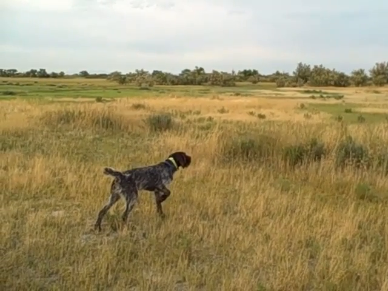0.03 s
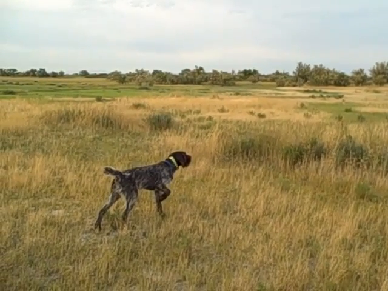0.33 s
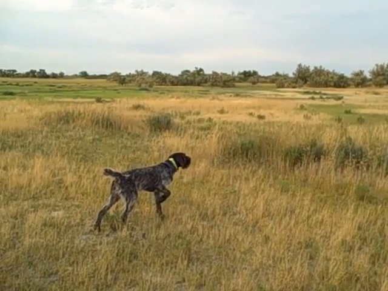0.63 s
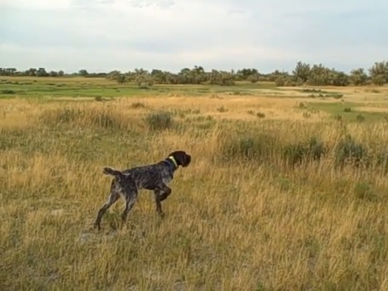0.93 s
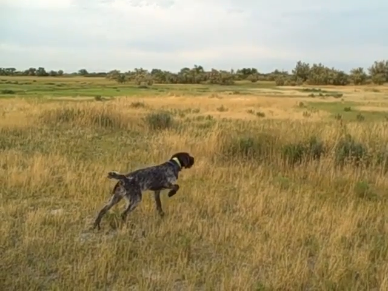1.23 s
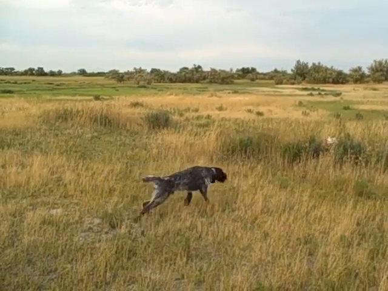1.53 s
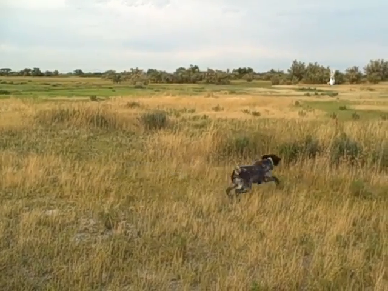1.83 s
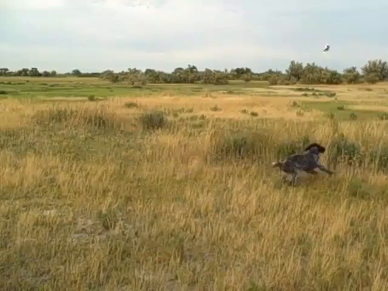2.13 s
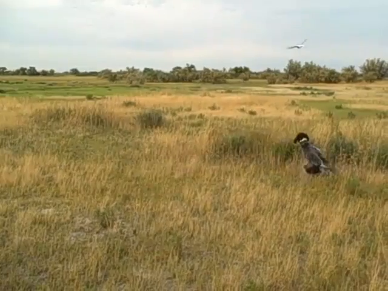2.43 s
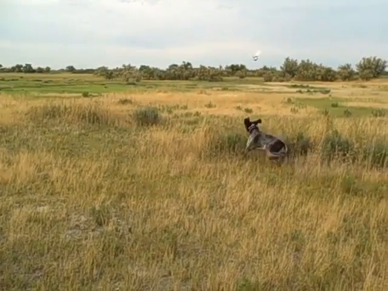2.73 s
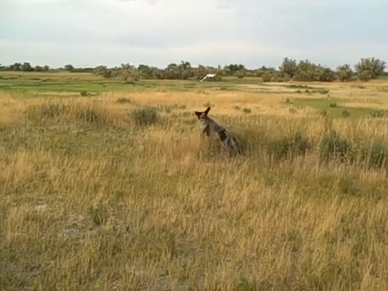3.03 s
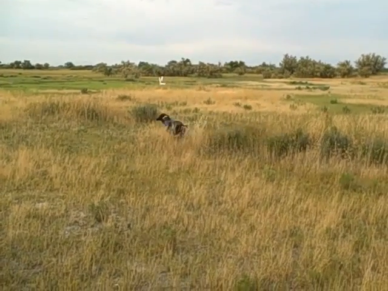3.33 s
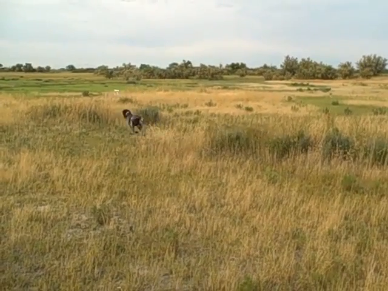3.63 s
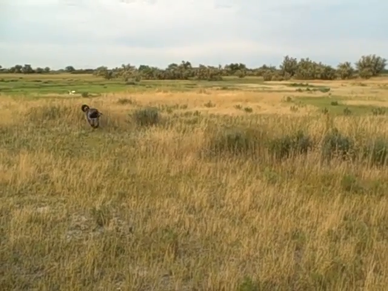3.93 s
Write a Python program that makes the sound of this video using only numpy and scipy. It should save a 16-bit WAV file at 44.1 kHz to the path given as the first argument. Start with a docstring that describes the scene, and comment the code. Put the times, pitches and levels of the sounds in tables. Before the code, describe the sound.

Wings clap as a bird takes off, with running paws, rustling grass and wind rumble.

```python
"""Open field of dry grass. Wind buffets the microphone; small birds call far off; a mosquito whines.
A pigeon-sized bird bursts out of the grass and climbs away, wing tips clapping, feathers humming.
A dog gallops after it: paws thud on the turf, stalks crackle and swish against its body."""
import sys
import numpy as np
from scipy import signal
from scipy.fft import rfft, irfft
from scipy.io import wavfile
from scipy.ndimage import uniform_filter1d

SR = 44100
rng = np.random.default_rng(int(sys.argv[2]) if len(sys.argv) > 2 else 0)


def transcribe(u):
    """Save the signal u as a 16-bit wav file named by the first command-line argument.

    u: samples, shape (n,) or (channels, n), limited to [-1, 1]; the rate is SR.
    q: integer samples, one column per channel.
    """
    v = np.clip(np.atleast_2d(u).T, -1, 1)
    q = np.round(v * 32767).astype(np.int16)
    wavfile.write(sys.argv[1], SR, q)


N = 176400
T = np.arange(N) / SR
SNAP_ATTACK_S, SWIPE_ATTACK_S = 0.00071, 0.0039
RASP = 0.022  # rms pitch deviation / pitch


def from_db(db):
    """Decibels to gain."""
    return 10 ** (np.asarray(db) / 20)


def rms_one(x):
    """Scale to rms 1."""
    return x / np.sqrt(np.mean(x ** 2) + 1e-20)


def coloured(x, colour):
    """Filter by (f/Hz, level/dB) points, rolling off beyond the ends; rms 1."""
    hz, db = np.transpose(colour)
    f_hz = np.arange(N // 2 + 1) * SR / N + 1e-3
    rolloff = np.minimum(1, f_hz / hz[0]) ** 2 * np.minimum(1, hz[-1] / f_hz) ** 2
    gain = from_db(np.interp(np.log(f_hz), np.log(hz), db))
    return rms_one(irfft(rfft(x) * rolloff * gain, N))


def noise(colour):
    """Coloured noise; rms 1."""
    return coloured(rng.standard_normal(N), colour)


def evened(x, span_s):
    """Hold the running rms near 1."""
    power = uniform_filter1d(x ** 2, max(int(span_s * SR), 2))
    return x / np.sqrt(np.abs(power) + 1e-9)


def pulse(at_s, attack_s, decay_s, hold_s=0):
    """Linear rise to 1 at at_s, hold, exponential decay."""
    rise = np.clip((T - at_s) / attack_s + 1, 0, 1)
    return rise * np.exp(-np.clip((T - at_s - hold_s) / decay_s, 0, 40))


def lumps(spread_db):
    """Gain wandering at about 10-20 Hz; rms 1."""
    return rms_one(from_db(spread_db * noise([(10, 0), (20, 0)])))


def crackle(per_s, spread_db):
    """Random clicks of uneven size; rms 1."""
    sizes = from_db(spread_db * np.minimum(rng.exponential(1, N), 5)) * rng.choice([-1, 1], N)
    return rms_one(sizes * (rng.random(N) < per_s / SR))


def resonance(x, hz, width_hz):
    """Two-pole band-pass, unity peak gain."""
    r = np.exp(-np.pi * width_hz / SR)
    feedback = [1, -2 * r * np.cos(2 * np.pi * hz / SR), r * r]
    return signal.lfilter(np.array([1, 0, -1]) * (1 - r * r) / 2, feedback, x)


def note(start_s, db, shape, rough=0.0076):
    """Sine along (t/s from start, f/Hz, relative level/dB) points, roughened by pitch jitter."""
    at_s, hz, shape_db = np.transpose(shape)
    age_s = T - start_s
    jitter = rms_one(uniform_filter1d(rng.standard_normal(N), size=90))
    pitch_hz = np.interp(age_s, at_s, hz) * (1 + rough * jitter)
    gate = (T > start_s) * (T < start_s + at_s[-1])
    level = uniform_filter1d(from_db(db + np.interp(age_s, at_s, shape_db)) * gate, size=90)
    return np.sqrt(2) * level * np.sin(2 * np.pi * np.cumsum(pitch_hz) / SR)


def wind():
    """Eddies rumble on the microphone in buffets, with a higher, lumpy flutter, over faint still air."""
    # buffets: t/s, length/s, rumble level/dB, flutter level/dB before flutter_gain_db
    buffets = [(0.08, 0.087, -28, -48), (0.277, 0.1, -28.5, -46), (0.46, 0.037, -39, -39),
               (.52, 0.28, -34, -45), (0.619, .1, -27, -37), (0.759, 0.28, -31, -47.5),
               (1.133, 0.058, -31.5, -57), (1.299, .2, -29, -57), (1.517, 0.15, -30.5, -43),
               (1.672, 0.23, -30.5, -47), (1.92, .24, -33, -60.5), (2.429, 0.17, -33.5, -56),
               (2.633, 0.326, -28.5, -52), (3.012, 0.45, -32, -52), (3.08, .02, -34, -41),
               (3.191, 0.018, -26.5, -42), (3.494, 0.05, -29.5, -49), (3.586, 0.066, -28.5, -56),
               (3.818, 0.015, -36.5, -64)]
    # rumble, flutter and still-air spectra: f/Hz, relative level/dB
    rumble_colour = [(25, -7), (75, 0), (135, -5.5), (200, -26.5), (330, -52)]
    flutter_colour = [(180, 14.5), (250, 2.5), (1100, -49.5)]
    air_colour = [(150, -0.5), (1000, -15), (16000, -34)]
    eddy_s, flutter_gain_db = 0.02765, 8
    rumble_lull_db, flutter_lull_db, air_db = -44.5, -73, -67
    at_s, length_s, rumble_db, flutter_db = np.transpose(buffets)[:, :, None]
    gates = pulse(at_s, attack_s=0.017, decay_s=0.0091, hold_s=length_s)
    rumble_level = np.hypot(np.max(from_db(rumble_db) * gates, axis=0), from_db(rumble_lull_db))
    flutter_level = np.hypot(np.max(from_db(flutter_db) * gates, axis=0), from_db(flutter_lull_db))
    rumble = rumble_level * evened(noise(rumble_colour), eddy_s)
    flutter = flutter_level * lumps(spread_db=3) * evened(noise(flutter_colour), eddy_s)
    return rumble + from_db(flutter_gain_db) * flutter + from_db(air_db) * noise(air_colour)


def far_birds():
    """Raspy chirps, a see-saw song, steady-pitched whistles and a thin falling note."""
    # note shapes: t/s from start, f/Hz, relative level/dB
    chirp_shape = [(0, 1950, -19), (.011, 3060, -5.5), (.015, 1820, -8.5), (.023, 2464, -2.5),
                   (.033, 2200, 4), (.058, 2080, -20)]
    seesaw_shape = [(0, 3110, -1.5), (.033, 3900, 2.5), (.0415, 4070, -12), (.043, 2950, 2),
                    (.059, 3400, -8)]
    falling_shape = [(0, 5050, -8), (.01, 5860, -4), (.016, 8500, -16), (.046, 6200, -70), (.052, 6200, 1),
                     (.078, 5980, -1), (.125, 5230, -11)]
    # chirps: t/s, level/dB
    chirps = [(0.676, -60.5), (0.889, -50), (2.524, -57)]
    # whistles: t/s, length/s, f/Hz, level/dB
    whistles = [(0.667, 0.11, 3812, -70.5), (3.24, 0.11, 3300, -74.5), (3.61, 0.16, 3216, -68.5)]
    song_start_s, song_period_s = 1.069, 0.1275
    calls = sum(note(at_s, db, chirp_shape, RASP) for at_s, db in chirps)
    calls += sum(note(song_start_s + k * song_period_s, db=-69, shape=seesaw_shape) for k in range(4))
    for at_s, length_s, hz, db in whistles:
        calls += note(at_s, db, [(0, hz, -6), (0.052, hz, 0), (length_s, hz, -6)])
    return calls + note(start_s=3.858, db=-56, shape=falling_shape)


def mosquito():
    """The wingbeat tone and its octave swell and fade as it drifts past."""
    # passes: t/s, length/s, level/dB
    passes = [(0.89, 0.52, -74.5), (2.526, 0.58, -73)]
    wingbeat_hz = 585
    return sum(note(at_s, db, [(0, hz, -10), (length_s / 2, hz, 0), (length_s, hz, -10)], rough=0.0072)
               for at_s, length_s, db in passes for hz in (wingbeat_hz, 2 * wingbeat_hz))


def grass():
    """Stalks brush and crackle along the running dog; a few whip and snap."""
    # rustle envelope: t/s, level/dB
    envelope = [(1.45, -74), (1.7, -61.5), (1.83, -59), (1.9, -63), (2.12, -61), (2.32, -60.5),
                (2.55, -58.5), (2.66, -64.5), (2.88, -64.5), (3.02, -56.5), (3.08, -61), (3.17, -59.5),
                (3.33, -63.5), (3.46, -60), (4, -69.5)]
    # snapping stalks: t/s, level/dB, decay/s
    snaps = [(3.035, -41, 0.0018), (3.043, -40, .0014), (3.145, -43, 0.0048), (3.1601, -37, 0.0066),
             (3.207, -47, .003)]
    # rustle and snap spectra: f/Hz, relative level/dB
    rustle_colour = [(550, 6.5), (2000, 2), (5000, -3), (16000, -5)]
    snap_colour = [(600, -8), (3500, -8), (6000, -1.5), (16000, 2)]
    brush_share = 0.41
    tall_grass_s, thin_below_hz, low_loss = 2.6, 3760, 0.31
    stalks = np.sqrt(1 - brush_share) * crackle(per_s=2300, spread_db=3)
    brush = np.sqrt(brush_share) * rng.standard_normal(N)
    rustle = coloured(stalks + brush, rustle_colour)
    lows = signal.sosfilt(signal.butter(1, thin_below_hz, fs=SR, output="sos"), rustle)
    rustle -= low_loss * np.clip((T - tall_grass_s) / 0.092, 0, 1) * lows  # thinner in tall grass
    snap_level = sum(from_db(db) * pulse(at_s, SNAP_ATTACK_S, decay_s) for at_s, db, decay_s in snaps)
    rustle_level = from_db(np.interp(T, *np.transpose(envelope)))
    return snap_level * noise(snap_colour) + rustle_level * lumps(spread_db=1.5) * rustle


def takeoff():
    """Feathers thrash through the stalks in short swipes; a thin falling swish precedes the loudest."""
    # swipes: t/s, level/dB, decay/s
    swipes = [(1.492, -56, 0.0012), (1.6543, -35.5, .0045), (1.666, -39.5, .012), (1.709, -47.5, 0.029),
              (1.932, -55.5, 0.019), (2.091, -51, 0.018)]
    # swipe spectrum: f/Hz, relative level/dB
    swipe_colour = [(900, -2), (1700, -3), (4600, 2.5), (16000, -12)]
    # swish: t/s from start, f/Hz, level/dB
    swish_shape = [(0, 7460, -72), (.044, 4200, -73)]
    grains = coloured(crackle(per_s=13000, spread_db=4.5), swipe_colour)
    level = sum(from_db(db) * pulse(at_s, SWIPE_ATTACK_S, decay_s) for at_s, db, decay_s in swipes)
    return level * grains + note(start_s=1.607, db=0, shape=swish_shape, rough=RASP)


def paws():
    """Each paw lands with a hollow thud of turf and a crunch of dry stalks."""
    # footfalls: t/s, level/dB, thud f/Hz
    footfalls = [(1.68, -47, 495), (1.9925, -37, 373), (2.031, -45.5, 620), (2.12, -34.5, 365),
                 (2.143, -44, 403), (2.207, -44, 556), (2.257, -39, 415), (2.374, -40.5, 365),
                 (2.485, -43.5, 346), (2.599, -45, 340)]
    # crunch spectrum: f/Hz, relative level/dB
    crunch_colour = [(450, 5.5), (750, -4.5), (1800, -10), (16000, -34)]
    attack_s, turf_decay_s, crunch_decay_s, crunch_gain_db = 0.0051, 0.0058, 0.0062, -3.5
    crunch = from_db(crunch_gain_db) * evened(noise(crunch_colour), crunch_decay_s)
    steps = np.zeros(N)
    for at_s, db, hz in footfalls:
        thud = pulse(at_s, attack_s, turf_decay_s) * np.sin(2 * np.pi * hz * (T - at_s))
        steps += from_db(db) * (thud + pulse(at_s, attack_s, crunch_decay_s) * crunch)
    return steps


def wing_claps():
    """Wing tips meet in a sharp clap with a hollow body; feathers then brush apart."""
    # claps: t/s, level/dB
    claps = [(1.863, -37.5), (1.982, -45.5), (2.0577, -45), (2.116, -43.5), (2.169, -42.5), (2.226, -39.5),
             (2.2858, -42.5), (2.344, -47.5), (2.3988, -48.5), (2.6269, -51.5), (2.688, -51.5),
             (2.743, -47.5), (2.8604, -49.5), (2.9249, -51.5), (2.982, -47.5)]
    # clap spectrum: f/Hz, relative level/dB
    clap_colour = [(600, 7), (3000, -4.5), (5000, 0), (16000, -9.5)]
    brush_gain_db, click_gain_db, body_gain_db = -13.5, 10.5, -1
    feathers = evened(noise(clap_colour), span_s=0.0068)
    cracks = np.zeros(N)
    for at_s, db in claps:
        hit = pulse(at_s, SNAP_ATTACK_S, decay_s=0.0017)
        brush = from_db(brush_gain_db) * pulse(at_s, SWIPE_ATTACK_S, decay_s=0.01)
        cracks += from_db(db) * (hit + brush) * feathers
        cracks[int(at_s * SR)] += from_db(db + click_gain_db)
    return cracks + from_db(body_gain_db) * resonance(cracks, hz=1560, width_hz=1100)


def wing_hum():
    """Air hums through the flight feathers on each stroke, fading as the bird climbs away."""
    hum_hz, width_hz, stroke_hz = 598, 87, 15
    peak_s, peak_db = 2.03, -58
    air = resonance(rng.standard_normal(N), hum_hz, width_hz)
    hum = rms_one(resonance(air, hum_hz, width_hz))
    strokes = np.cos(np.pi * stroke_hz * (T - peak_s)) ** 2
    return from_db(peak_db) * hum * strokes * pulse(peak_s, attack_s=2 / stroke_hz, decay_s=0.86)


def scene():
    """All sources in open air, mono."""
    return (wind() + takeoff() + wing_claps() + wing_hum() + paws() + grass()
            + far_birds() + mosquito())[None]


def record(dry):
    """Steep low-pass."""
    cutoff_hz = 16200
    return signal.sosfilt(signal.ellip(10, .1, 80, cutoff_hz, fs=SR, output="sos"), dry)


dry = scene()
out = record(dry)
transcribe(out)
```